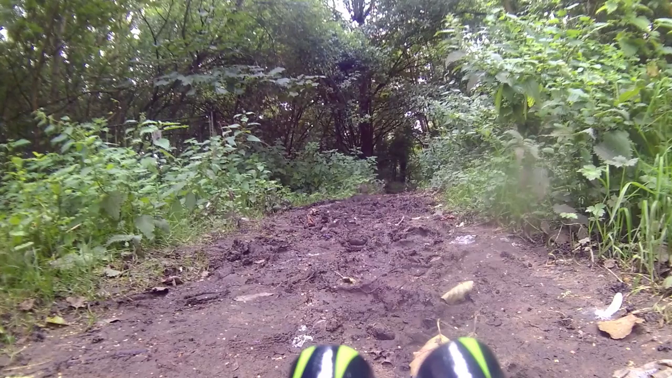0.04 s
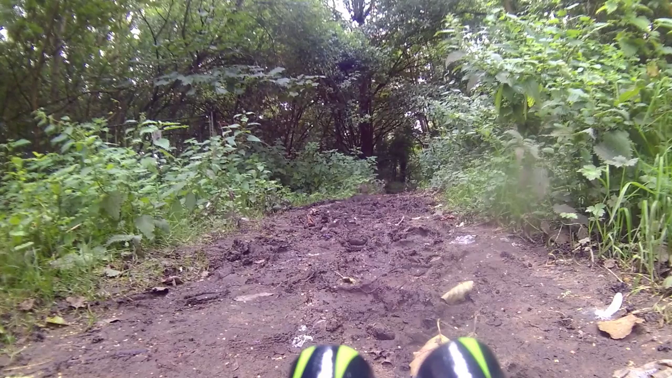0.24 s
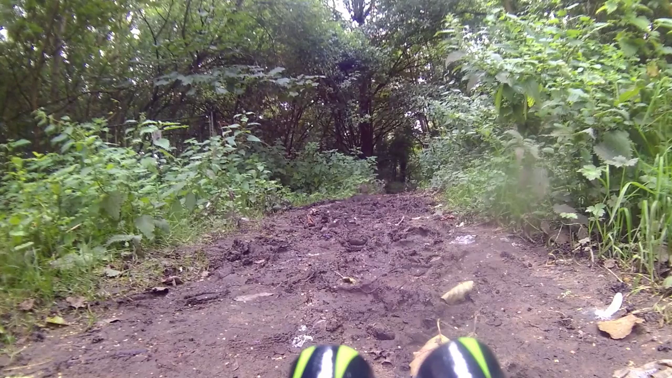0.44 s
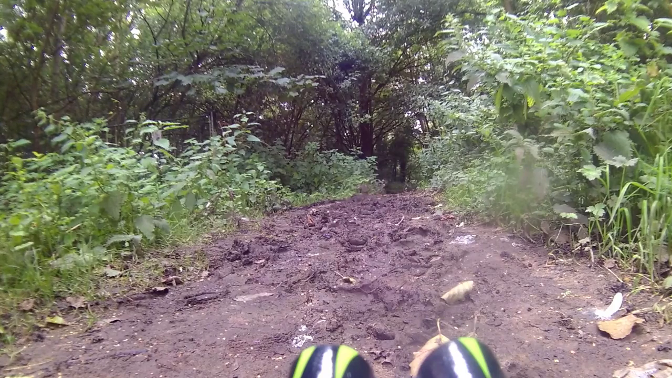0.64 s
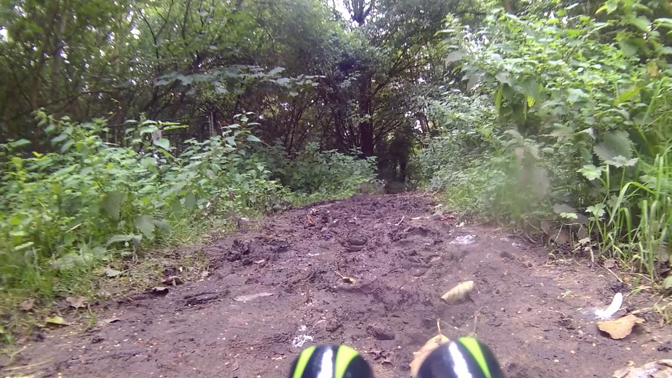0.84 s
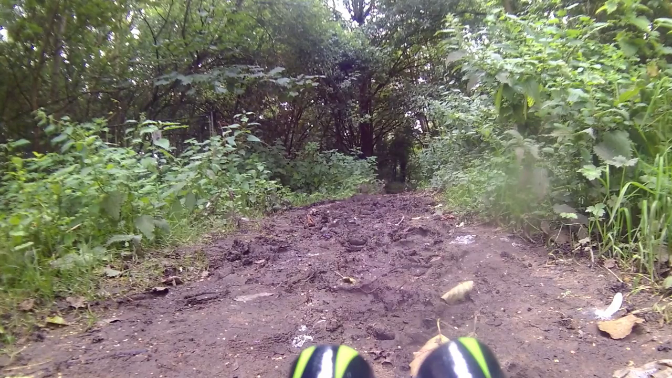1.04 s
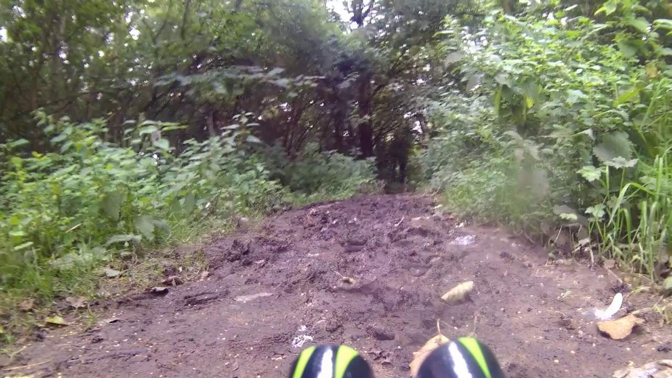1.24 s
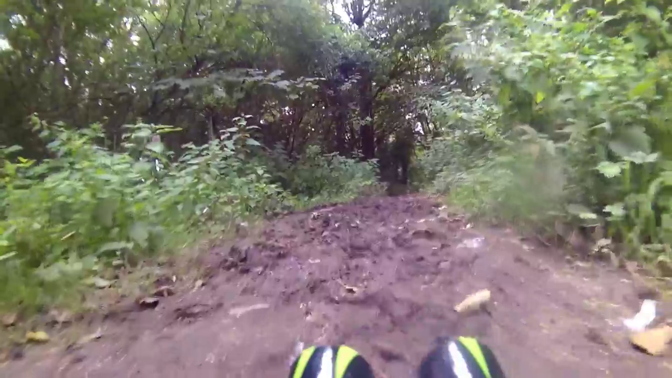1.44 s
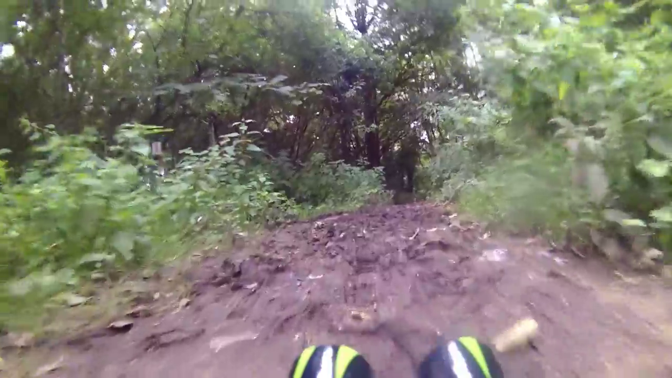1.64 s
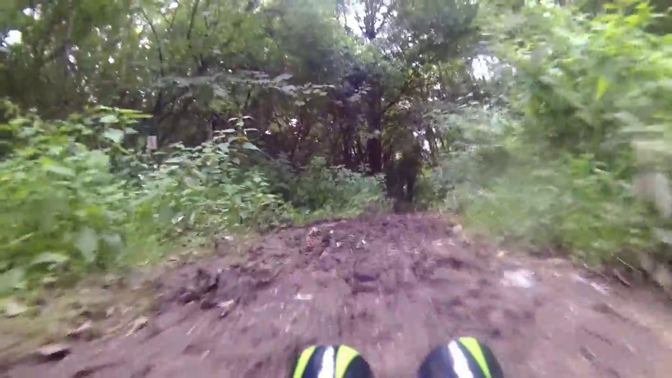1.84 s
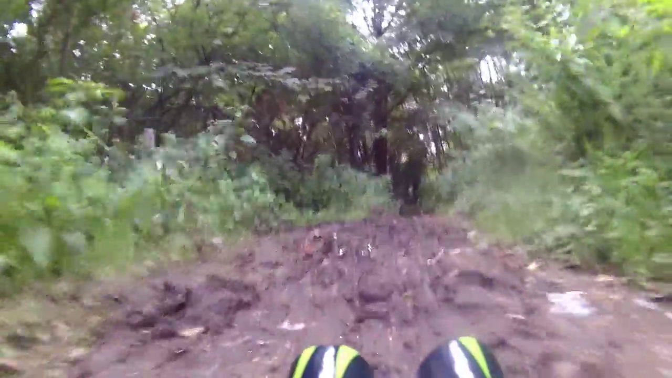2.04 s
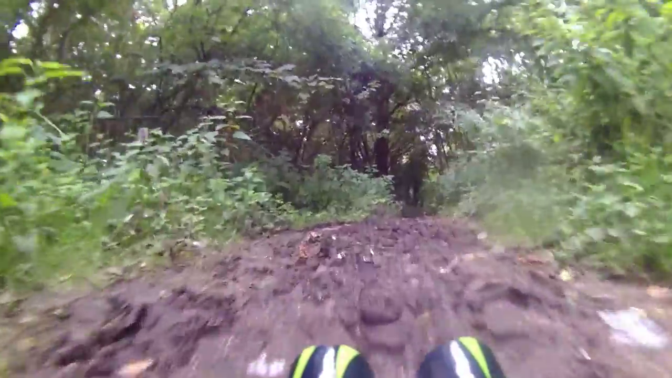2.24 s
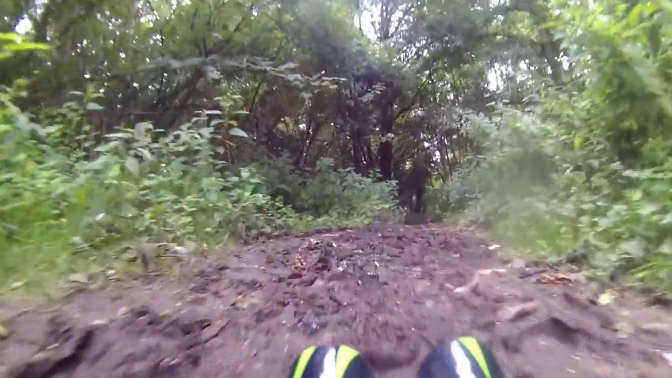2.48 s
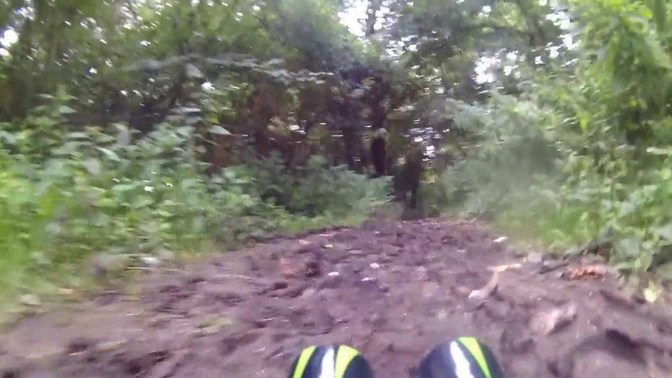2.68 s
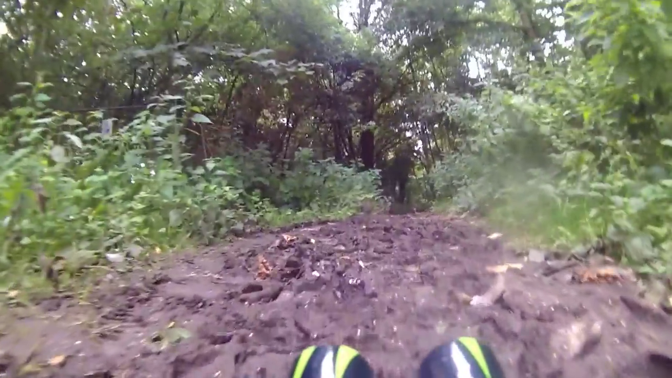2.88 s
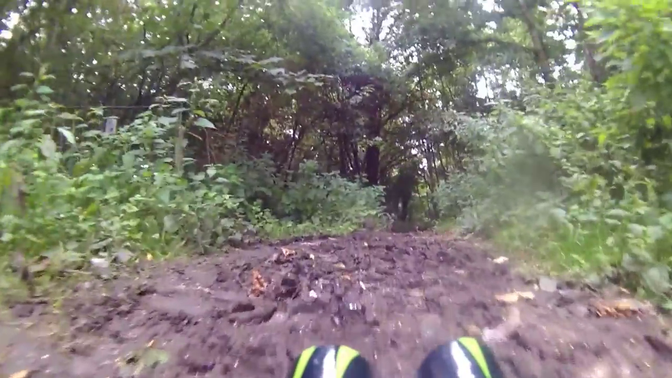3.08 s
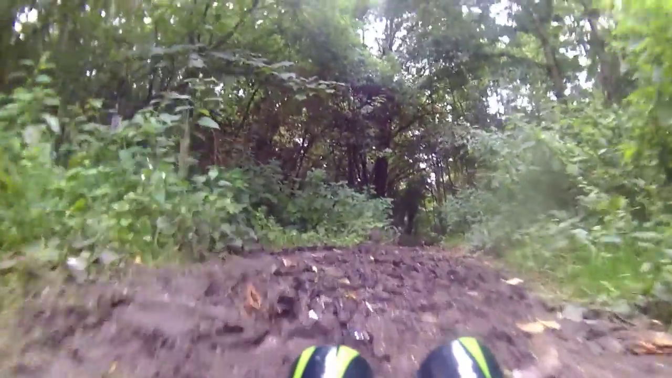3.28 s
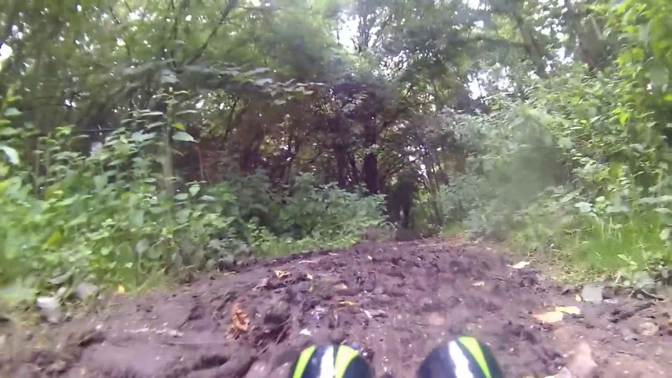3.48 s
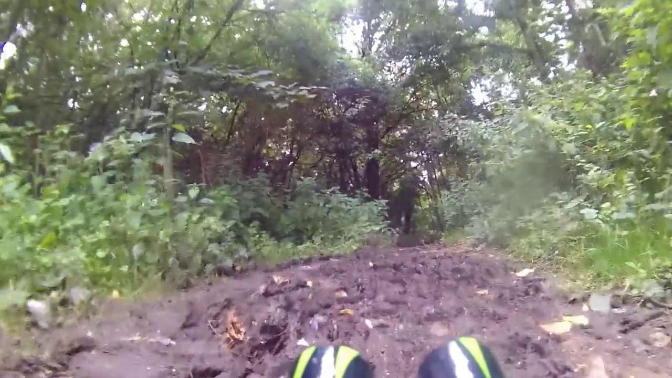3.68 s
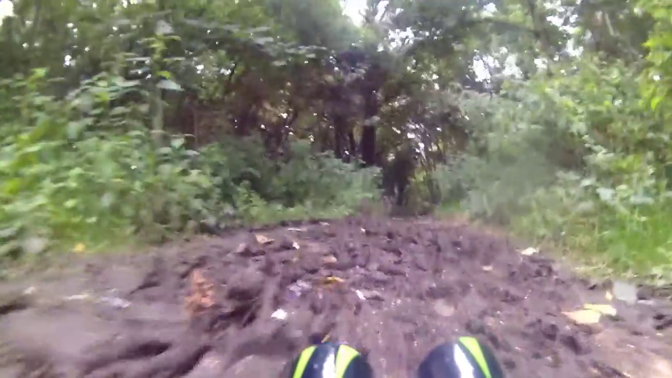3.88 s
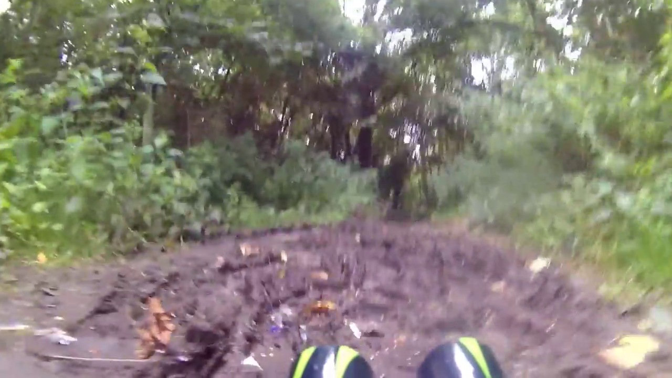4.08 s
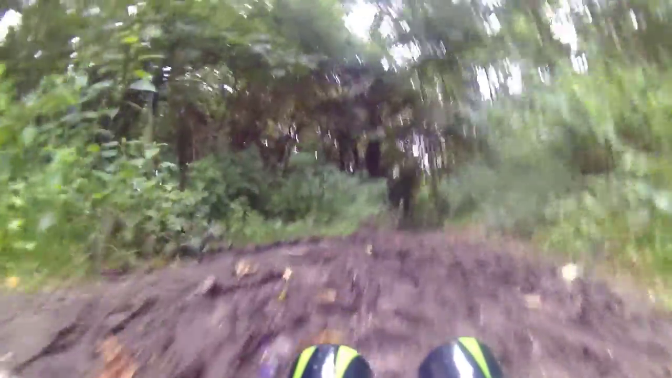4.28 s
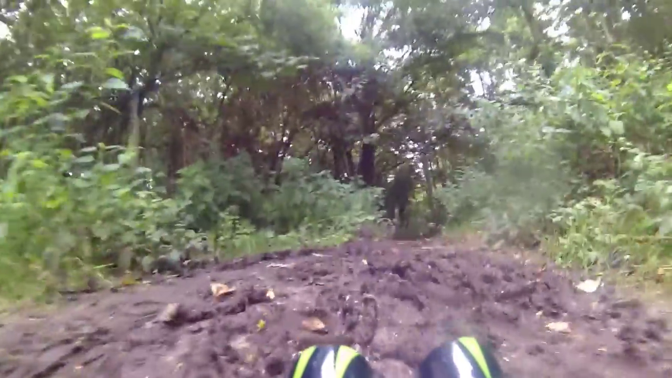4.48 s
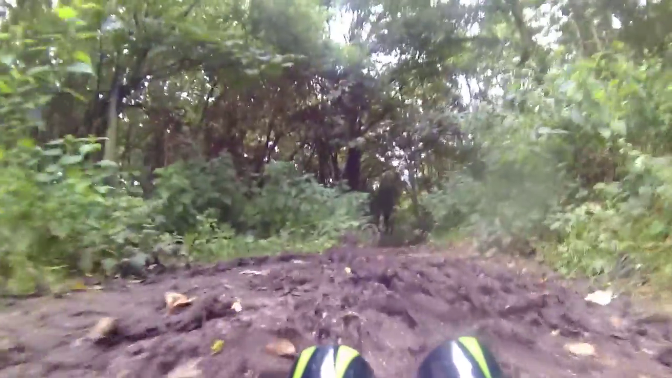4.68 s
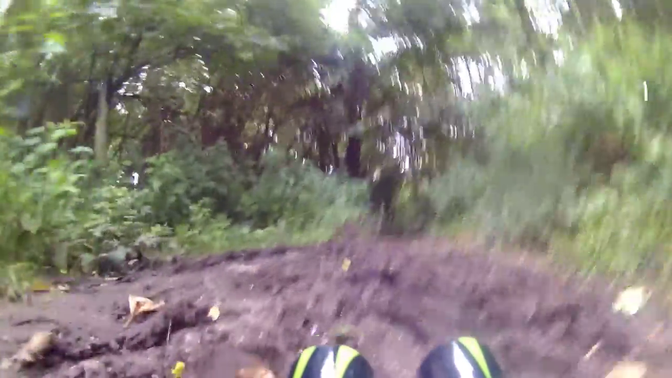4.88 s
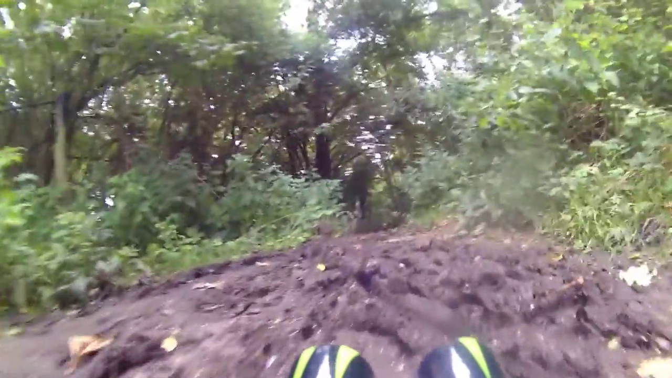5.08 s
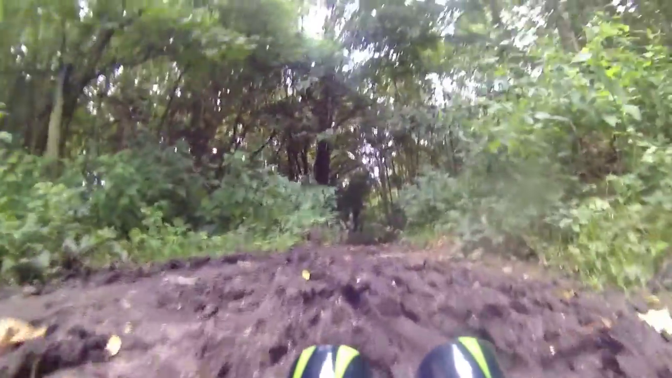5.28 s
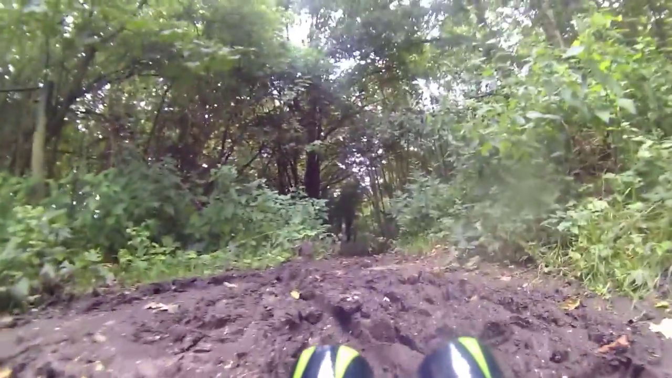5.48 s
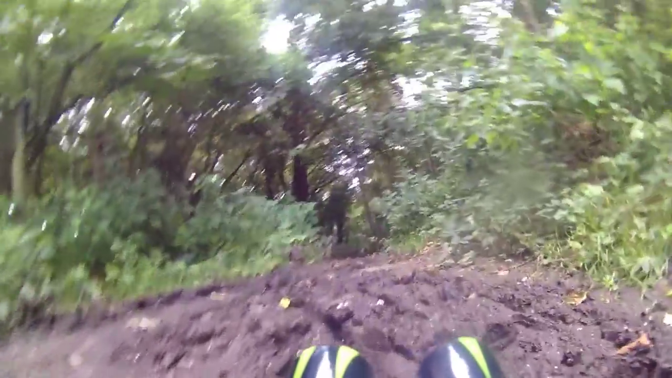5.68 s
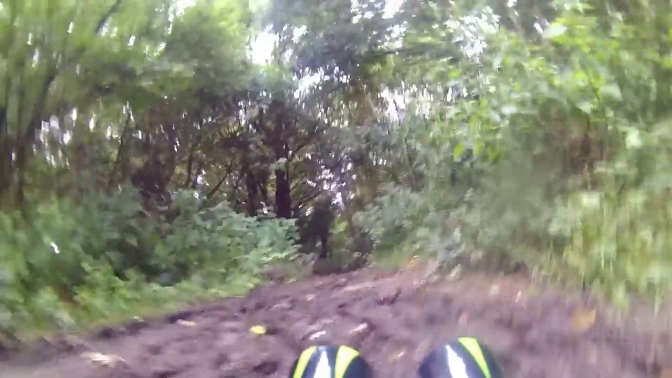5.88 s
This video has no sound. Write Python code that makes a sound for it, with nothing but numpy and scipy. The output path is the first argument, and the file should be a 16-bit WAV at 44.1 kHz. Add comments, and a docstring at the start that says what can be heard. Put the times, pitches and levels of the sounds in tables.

```python
"""Soft outdoor air and a thin electronic hum come first, then a small radio-controlled truck drives off in bursts.
Its chopped motor current sings, its gear teeth whine and rattle in the plastic body, and slack gears knock.
The tyres flick grit, stones tick on the shell and jolts shake the chassis: shaped noise, clicks and ringing tones.
Only the left microphone works, heard from the chassis; the right channel carries a faint hiss."""
import sys
import numpy as np
from scipy import signal
from scipy.fft import rfft, irfft
from scipy.io import wavfile
from scipy.ndimage import uniform_filter1d

SR = 44100
rng = np.random.default_rng(int(sys.argv[2]) if len(sys.argv) > 2 else 0)


def transcribe(u):
    """Save the signal u as a 16-bit wav file named by the first command-line argument.

    u: samples, shape (n,) or (channels, n), limited to [-1, 1]; the rate is SR.
    q: integer samples, one column per channel.
    """
    v = np.clip(np.atleast_2d(u).T, -1, 1)
    q = np.round(v * 32767).astype(np.int16)
    wavfile.write(sys.argv[1], SR, q)


N = 261323
TIME = np.arange(N) / SR
LEFT_GAIN = 2  # plain factor on the whole left channel; the source levels below are those before it

# Outdoor air, shape of the noise only: pitch_hz, level_db (per Hz)
AIR_COLOUR = [(30, -60), (48, -33.5), (197, -17), (492, -14.5), (747, -12.5), (1400, -19), (2910, -28),
              (4310, -23), (5890, -28.5), (15500, -31.5)]
# Sizzle of the waiting electronics: pitch_hz, wander_hz, level_db
SIZZLE = [(4400, 160, -78), (7770, 330, -81)]
HUM_HZ, HUM_DB, AIR_DB = 750, -69, -67
# Self-noise of the microphone input, shape only: pitch_hz, level_db (per Hz)
HISS_COLOUR = [(80, -46), (200, -14), (450, -7.5), (800, -6), (4000, -6.5), (15000, -7.5)]
HISS_DB, TOP_EDGE_HZ = -66, 15700

# Stones that strike the body: start_s, level_db (of the tick, and of the ping)
STONES = [(1.107, -52), (1.413, -55), (1.631, -59), (1.701, -63), (1.761, -60), (3.657, -53), (3.787, -54),
          (4.417, -46.5), (5.347, -53)]
PING_HZ, PING_FADE_S = 5430, 0.0025
# Colour of the flying grit: pitch_hz, gain_db
GRIT_COLOUR = [(100, -6), (1000, 21.5), (4000, 15.5), (7000, -4), (10000, 1), (15000, -1)]
# Blows that shake the chassis, a few to each jolt: start_s, level_db, struck_part_hz, crack_db
# (level_db is shared: the ring and the clatter each sit a little below it)
JOLTS = [(1.107, -32, 980, -43), (1.119, -26, 822, -44), (1.152, -33, 697, -59), (2.221, -29, 983, -35.5),
         (2.234, -22.5, 862, -40), (2.831, -32, 1220, -42.5), (2.847, -23, 1088, -37.5),
         (2.886, -28, 798, -52), (3.478, -36.5, 844, -49), (3.494, -27, 856, -39.5),
         (3.506, -27.5, 645, -47), (4.203, -29, 1256, -44), (4.212, -24, 1095, -40.5)]
JOLT_RING_DB, JOLT_CLATTER_DB = -4, -6
JOLT_RISE_S, JOLT_FADE_S, CRACK_FADE_S = 0.006, 0.008, 0.0079

# Throttle held open: on_s, off_s
THROTTLE = [(1.056, 1.88), (2.142, 2.497), (2.513, 2.545), (2.787, 3.152), (3.219, 3.232), (3.411, 3.429),
            (3.444, 5.99)]
# Motor speed as the rate at which teeth meet; it sags wherever the wheels catch: time_s, tooth_rate_hz
MOTOR_SPEED = [(1.056, 300), (1.084, 833), (1.118, 853), (1.15, 588), (1.164, 312), (1.256, 386),
               (1.316, 578), (1.366, 610), (1.45, 850), (1.494, 840), (1.594, 1019), (1.866, 1231),
               (2.09, 732), (2.124, 820), (2.236, 855), (2.254, 676), (2.294, 801), (2.48, 880),
               (2.77, 571), (2.848, 1207), (2.872, 513), (2.894, 444), (2.933, 588), (3.03, 645),
               (3.156, 645), (3.43, 285), (3.484, 913), (3.555, 285), (3.63, 560), (3.724, 782),
               (3.826, 801), (3.876, 690), (3.907, 740), (3.954, 686), (4.024, 867), (4.093, 797),
               (4.153, 938), (4.197, 760), (4.29, 907), (4.33, 590), (4.398, 787), (4.433, 710),
               (4.494, 918), (4.536, 787), (4.591, 835), (4.655, 744), (4.71, 877), (4.773, 485),
               (4.931, 660), (4.954, 600), (5.006, 655), (5.04, 803), (5.09, 777), (5.122, 574),
               (5.21, 447), (5.276, 357), (5.4, 305), (5.5, 360), (5.566, 483), (5.607, 601), (5.675, 803),
               (5.697, 652), (5.735, 830), (5.814, 722), (5.873, 918), (5.928, 739)]
# Harmonics of the chopped current: multiple, level_db (before the swells), flutter_depth (plain factor)
CHOP_HARMONICS = [(1, -57.5, 0.42), (2, -66, 0.57), (3, -60.5, 0.4), (4, -85.5, 3.7)]
# They swell and fade with the current: time_s, first_change_db, third_change_db
CHOP_SWELLS = [(1.14, 9, 2), (1.45, -2, 2.5), (2.24, 6, 2), (2.33, -13, 0.5), (2.87, 11, -0.5),
               (2.98, 3, -1), (3.42, 6.5, 3.5), (3.61, 12, -3.5), (3.73, 2, 1), (5.02, 3, 2),
               (5.21, 6.5, 3.5), (5.62, 14, -1.5), (5.78, 2, -3.5), (5.91, 14, -1)]
CHOP_HZ = 1479.3  # fixed rate at which the controller chops the current
TEETH_PER_COMMUTATION = 8

# The gears grow louder (+) or quieter (-) for a moment, as in a rattle or a near-stop:
# centre_s, change_db, bell_width_s
LEVEL_CHANGES = [(1.186, -11.5, 0.012), (2.106, 15.5, 0.027), (2.65, -17, 0.0071), (3.382, -33, 0.019),
                 (3.458, -10.5, 0.013), (3.544, -14, 0.0071), (5.393, -1.5, 0.0058), (5.465, -10, 0.0042),
                 (5.8, 1, 0.15)]
# Teeth catch at a tight spot and the whine flares: centre_s, lift_db
BITES = [(1.129, 14.5), (1.49, 11.5), (1.565, -1), (1.633, 12), (1.694, 13), (1.758, 10.5), (1.818, 11),
         (2.323, 6.5), (2.406, 6.5), (3.729, 5.5), (3.79, 4), (3.906, 9), (4.003, 5.5), (4.061, 10.5),
         (4.476, 9.5), (4.556, 4), (4.639, 9.5), (4.728, 12.5), (5.074, 9), (5.865, 9), (5.920, 8)]
BITE_WIDTH_S = 0.0055
BITE_RASP_SHARE, BITE_GRIT_SHARE = 0.1, 0.76  # how much of the lift the gearbox and the tyres follow
# Force on the gears at 800 Hz, its rise with speed, its change when coasting
LOAD_DB, LOAD_DB_PER_OCTAVE, COAST_DB = -35.5, 2.5, -11
TAKE_UP_S, LET_GO_S = 0.053, 0.038  # the force builds and fades behind the throttle

# Slack gears knock while the truck coasts: start_s, level_db (lowered by KNOCK_TRIM_DB)
KNOCKS = [(1.921, -28.5), (1.953, -33), (1.986, -30.5), (2.001, -35), (2.058, -28.5), (2.625, -32.5),
          (2.677, -30), (2.7, -34.5), (2.733, -27.5), (2.744, -32), (3.178, -40), (3.222, -36),
          (3.283, -36), (3.324, -36.5), (3.352, -35)]
KNOCK_TRIM_DB, KNOCK_RISE_S, KNOCK_FADE_S = -5.5, 0.0029, 0.012
# Tones of the gear train: multiple (of the tooth rate), level_db (before the load)
GEAR_TONES = [(1, -1.5), (2, -5), (3, -14)]
WHINE_DB, RATTLE_DB = -6.6, -1
# Response of the plastic body: pitch_hz, gain_db
BODY = [(50, -35), (110, -27.5), (160, -33.5), (270, -10), (370, -8), (500, -7), (600, -0.5), (700, 3.5),
        (830, 4.5), (1150, 3.5), (1450, -2.5), (1650, 0), (1950, -14), (2600, -19.5), (6000, -43)]
# Extra colour of slack gears knocking: pitch_hz, gain_db
SLACK_COLOUR = [(250, 8), (600, -5.5), (850, 3), (1200, -0.5), (1650, -6), (2400, -4.5)]
# Extra colour of the rattle: pitch_hz, gain_db
RATTLE_COLOUR = [(250, 1), (400, -2.5), (600, -4), (730, -1), (850, 4), (1000, -1), (1300, 2), (1700, -0.5),
                 (2500, -7)]
# Treble response of the gearbox, shape only: pitch_hz, gain_db
GEARBOX = [(900, -8), (1700, 23), (2100, 22.5), (2550, 13), (2900, 22), (3300, 10), (3700, 18), (4100, 9),
           (4450, 10), (4900, 2), (6500, 0.5), (9000, -3.5), (15000, -72)]
# Narrow rings of the motor plate and gear cover: pitch_hz, width_hz, level_db
PLATE_RINGS = [(830, 55, -3), (1075, 55, -6), (1635, 70, -6)]


def amp(db):
    """Decibels to gain."""
    return 10 ** (np.asarray(db) / 20)


def unit(x):
    """Scales to an rms (average strength) of 1."""
    return x / np.sqrt(np.mean(x ** 2) + 1e-20)


def steady(x, size=4001):
    """Evens out the slow level of a sound to about rms 1."""
    power = uniform_filter1d(uniform_filter1d(x ** 2, size // 2), size // 2)
    return x / np.sqrt(abs(power) + 1e-12)


def curves(rows):
    """Each column of a table, joined by straight lines in time."""
    s, *columns = np.transpose(rows)
    return [np.interp(TIME, s, column) for column in columns]


def colour(x, points):
    """Filters with a table of pitches and gains, without any sound ahead of its cause."""
    hz, db = np.transpose(points)
    size = 4096
    filter_hz = abs(np.fft.fftfreq(size, 1 / SR))
    gain_db = np.interp(np.log(filter_hz + 1), np.log(hz), db)
    # The Hilbert transform gives the phase that puts the energy as early as possible
    spectrum = np.exp(np.conj(signal.hilbert(np.log(amp(gain_db)))))
    ring = np.fft.ifft(spectrum).real
    return signal.oaconvolve(x, ring[:size // 2])[:N]


def wander(rate_hz):
    """Smooth random motion of rms 1, up to about the given rate."""
    size = 2 ** 18
    hz = np.fft.rfftfreq(size, 1 / SR)
    slow = rfft(rng.standard_normal(size)) * np.exp(-(hz / rate_hz) ** 2)
    return unit(irfft(slow)[:N])


def clicks(per_s, spread_db):
    """Random clicks of uneven size and either sign."""
    size = amp(spread_db * np.minimum(rng.exponential(1, N), 4))
    return size * rng.choice([-1, 1], N) * (rng.random(N) < per_s / SR)


def swell(s, width_s):
    """A bell-shaped rise and fall around a moment."""
    return np.exp(-.5 * ((TIME - s) / width_s) ** 2)


def since(s):
    """Time gone by since a moment, zero before it."""
    return np.maximum(TIME - s, 0)


def strike(s, rise_s, fade_s):
    """A quick rise at a moment, then a free decay."""
    return np.minimum(since(s) / rise_s, 1) * np.exp(-since(s + rise_s) / fade_s)


def lag(x, rise_s, fall_s):
    """Follows x with inertia, at one pace up and another down."""
    hop = 44  # samples between steps, about 1 ms
    up, down = 1 - np.exp(-hop / SR / np.array([rise_s, fall_s]))
    out = [0.]
    for goal in x[hop::hop].tolist():
        pace = up if goal > out[-1] else down
        out.append(out[-1] + (goal - out[-1]) * pace)
    return np.interp(TIME, TIME[::hop], out)


def plate(x):
    """Adds the narrow rings of the motor plate and gear cover."""
    out = x
    for hz, width_hz, db in PLATE_RINGS:
        out = out + amp(db) * signal.lfilter(*signal.iirpeak(hz, hz / width_hz, fs=SR), x)
    return out


def background():
    """Soft outdoor air is shaped noise; the truck's electronics add an unsteady hum and sizzle."""
    out = amp(AIR_DB) * unit(colour(rng.standard_normal(N), AIR_COLOUR))
    hum = np.cos(2 * np.pi * HUM_HZ * TIME + .15 * wander(10))
    out += amp(HUM_DB) * unit((1 + .07 * wander(15)) * hum)
    for hz, wander_hz, db in SIZZLE:
        tone = np.cos(2 * np.pi * hz * TIME + wander(wander_hz))
        out += amp(db) * unit(wander(wander_hz) * tone)
    return out


def stones():
    """Stones tick on the shell, each with a short ping of its own pitch."""
    out = np.zeros(N)
    tick = rng.standard_normal(N)
    for (s, db), detune in zip(STONES, rng.uniform(-1.6, 1, len(STONES))):
        ping = np.sin(2 * np.pi * PING_HZ * (1 + 0.069 * detune) * since(s))
        fade = (TIME > s) * np.exp(-since(s) / PING_FADE_S)
        out += amp(db) * fade * (tick + ping)
    return out


def grit(tooth_hz, pull_db):
    """Tyres throw more grit with speed, and throw it harder the harder they pull."""
    grains_per_s = 900 * np.minimum(tooth_hz / 800, 1) * (TIME > 1.1)
    spray = clicks(grains_per_s, 1.25) * amp(pull_db + 2 * wander(12))
    return colour(amp(-66.5) * unit(spray), GRIT_COLOUR)


def chassis():
    """Each blow cracks, sets the struck part ringing and makes loose parts clatter."""
    clatter = signal.lfilter(*signal.butter(1, 300, "high", fs=SR), clicks(5100, 1.0))
    body = steady(colour(clatter, BODY), size=301)
    crack = unit(colour(clatter, GEARBOX))
    out = np.zeros(N)
    for s, db, hz, crack_db in JOLTS:
        part = np.sqrt(2) * np.sin(2 * np.pi * hz * since(s))
        shaken = amp(JOLT_RING_DB) * part + amp(JOLT_CLATTER_DB) * body
        out += amp(db) * strike(s, JOLT_RISE_S, JOLT_FADE_S) * shaken
        out += amp(crack_db) * (TIME > s) * np.exp(-since(s) / CRACK_FADE_S) * crack
    return out


def throttle():
    """1 while the motor is powered, 0 while it coasts, with short ramps between."""
    is_open = sum(1. * ((TIME > on) & (TIME < off)) for on, off in THROTTLE)
    return uniform_filter1d(is_open, size=130)


def controller(teeth, power):
    """Chopped current makes the windings sing; every commutation dents the tone."""
    step = 2 * np.pi * teeth / TEETH_PER_COMMUTATION + 0.3 * wander(7.8)
    first_db, third_db = curves(CHOP_SWELLS)
    # The second harmonic follows the first in part; the fourth does not swell
    swells_db = (first_db, 0.29 * first_db + 0.5, third_db, 0)
    out = np.zeros(N)
    for (multiple, db, depth), swell_db in zip(CHOP_HARMONICS, swells_db):
        flutter = 1 + depth * np.cos(step + multiple) + 0.23 * wander(93)
        tone = np.sqrt(2) * np.sin(2 * np.pi * multiple * CHOP_HZ * TIME)
        out += amp(db + swell_db) * flutter * tone
    return out * power


def load(tooth_hz, power):
    """Strength of the gear sound in dB, from speed, throttle and brief level changes."""
    changes_db = sum(db * swell(s, width_s) for s, db, width_s in LEVEL_CHANGES)
    octaves = np.log2(np.maximum(tooth_hz, 200) / 800)
    coast_db = COAST_DB * (1 - lag(power, TAKE_UP_S, LET_GO_S))
    return LOAD_DB + LOAD_DB_PER_OCTAVE * octaves + coast_db + changes_db


def slack_knocks():
    """Single light knocks of the unloaded gears ring the motor plate and die away."""
    shake = sum(amp(db + KNOCK_TRIM_DB) * strike(s, KNOCK_RISE_S, KNOCK_FADE_S) for s, db in KNOCKS)
    noise = colour(rng.standard_normal(N), SLACK_COLOUR)
    light = signal.lfilter(*signal.butter(2, 520, "high", fs=SR), noise)
    return shake * steady(plate(colour(light, BODY)), size=301)


def tooth_knocks(teeth):
    """Each tooth lands a little early or late, with its own force."""
    landed = np.diff(np.floor(teeth + .12 * wander(300)), prepend=0) > 0
    return unit(landed * np.tanh(1.5 * rng.standard_normal(N)))


def uneven_teeth(teeth):
    """Slightly unequal teeth repeat their pattern: a comb of side tones that glides with the speed."""
    coarse = TIME[::500]  # the strengths drift slowly, so they are drawn on a coarse grid
    out = np.zeros(N)
    for order in np.arange(2, 33) / TEETH_PER_COMMUTATION:
        a, b = uniform_filter1d(rng.standard_normal((2, len(coarse))), size=5, axis=1)
        angle = 2 * np.pi * order * teeth
        tone = np.interp(TIME, coarse, a) * np.cos(angle) + np.interp(TIME, coarse, b) * np.sin(angle)
        out += tone / (1 + (order / 5.5) ** 2)
    return unit(out)


def whine(teeth, speed, bite_db):
    """Meshing gears sing in bursts as the teeth bounce; each bite seats them and swells the main tone."""
    loose = amp(-bite_db)
    out = np.zeros(N)
    for order, db in GEAR_TONES:
        bounce = loose * order * ((.3 + .27 * speed ** 4) * wander(70) + .35 * wander(22))
        flutter = 1 + loose * (.55 * wander(55) + .25 * wander(14))
        lift_db = bite_db if order == 1 else 0
        force = amp(db + lift_db) * flutter / np.maximum(speed, 1) ** order
        out += force * np.sqrt(2) * np.cos(2 * np.pi * order * teeth + bounce)
    return colour(out, BODY)


def gears(teeth, tooth_hz, power, load_db, bite_db):
    """Meshing teeth whine under power and chatter in their backlash; body and gearbox ring with both."""
    speed = tooth_hz / 800
    drive = np.clip(uniform_filter1d(power, size=1500), 0, 1)
    # The backlash (play between teeth) chatters as each tooth lands
    commutation_angle = 2 * np.pi * teeth / TEETH_PER_COMMUTATION
    contact = np.exp(0.4 * np.cos(2 * np.pi * teeth) + 0.026 * np.cos(commutation_angle))
    chatter = unit(contact * clicks(8000, 2.4))
    # The force pulses with each commutation
    pulse = 1 + .5 * np.cos(commutation_angle + 0.7 * wander(10.6))
    landing = tooth_knocks(teeth) + .35 * chatter
    rattle = drive * (.7 * pulse * landing + .33 * uneven_teeth(teeth))
    # Coasting knocks the slack gears together, with a hollower ring
    knocks = (1 - drive) * colour(clicks(2500, 2.4) * 2, SLACK_COLOUR)
    lumps_db = (1.3 + 1.5 * np.clip(1 - speed, 0, 1)) * wander(45)
    shaking = colour(rattle + knocks, RATTLE_COLOUR) * amp(lumps_db)
    body = amp(RATTLE_DB) * steady(plate(colour(shaking, BODY)), size=5001)
    # The gearbox rasps more at speed and under power
    rasp_db = -26.3 + 2.8 * speed ** 2 + 6 * drive + BITE_RASP_SHARE * bite_db
    box = steady(colour(chatter * pulse, GEARBOX)) * amp(rasp_db + 1.5 * wander(47))
    singing = amp(WHINE_DB) * (0.21 + 0.9 * drive) * whine(teeth, speed, bite_db)
    running = np.clip((TIME - 1.055) / .004, 0, 1)  # silent until the truck starts
    return running * amp(load_db) * (body + singing + box)


def scene():
    """One motor speed drives the gears, the controller's flutter and the tyres."""
    power = throttle()
    tooth_hz = curves(MOTOR_SPEED)[0] * (1 + .021 * wander(32))
    teeth = np.cumsum(tooth_hz) / SR  # teeth passed so far
    load_db = load(tooth_hz, power)
    bite_db = sum(db * swell(s, BITE_WIDTH_S) for s, db in BITES)
    ground = stones() + grit(tooth_hz, load_db + BITE_GRIT_SHARE * bite_db) + chassis()
    drivetrain = controller(teeth, power) + slack_knocks() + gears(teeth, tooth_hz, power, load_db, bite_db)
    left = LEFT_GAIN * (background() + ground + drivetrain)
    return np.array([left, np.zeros(N)])


def record(dry):
    """The dead right input only hisses; then both channels lose the highest treble."""
    hiss = amp(HISS_DB) * unit(colour(rng.standard_normal(N), HISS_COLOUR))
    both = dry + np.array([np.zeros(N), hiss])
    low_pass = signal.firwin(511, TOP_EDGE_HZ, window=("kaiser", 9), fs=SR)
    return signal.oaconvolve(both, low_pass[None], "same")


dry = scene()
out = record(dry)
transcribe(out)
```